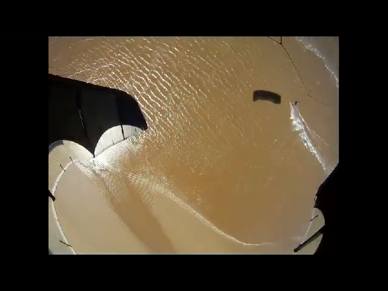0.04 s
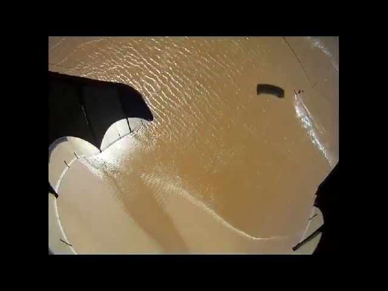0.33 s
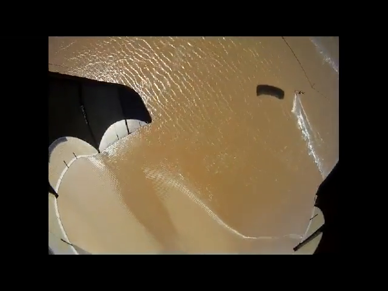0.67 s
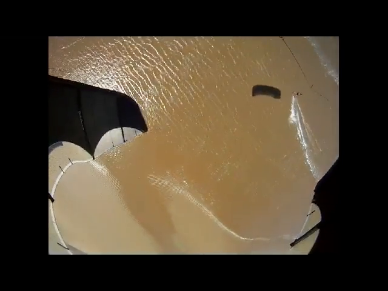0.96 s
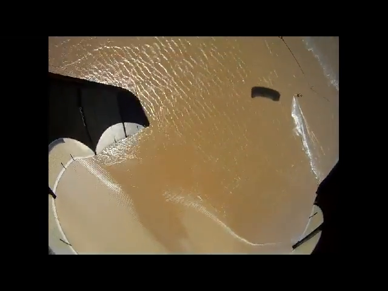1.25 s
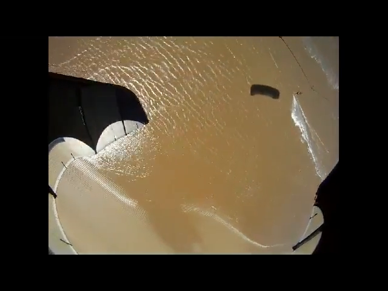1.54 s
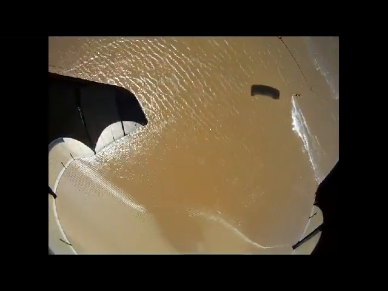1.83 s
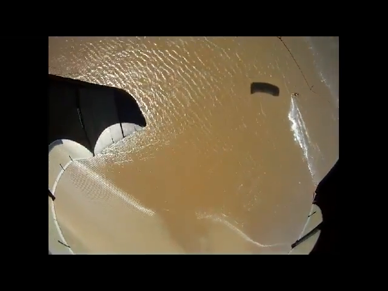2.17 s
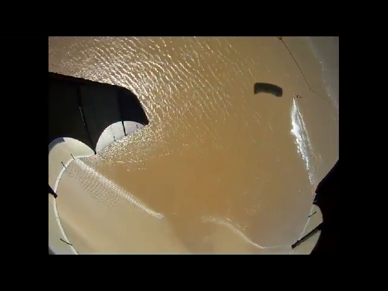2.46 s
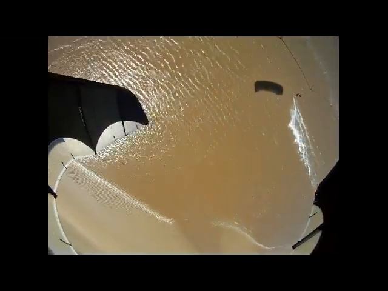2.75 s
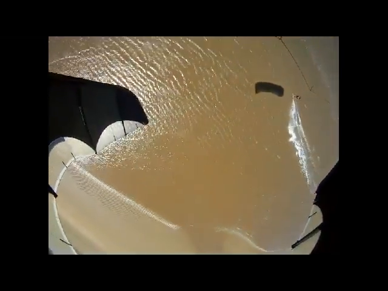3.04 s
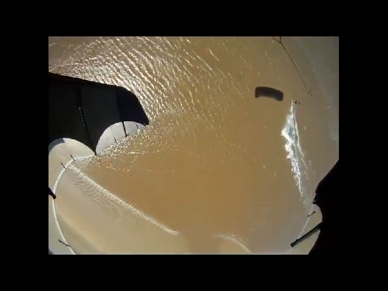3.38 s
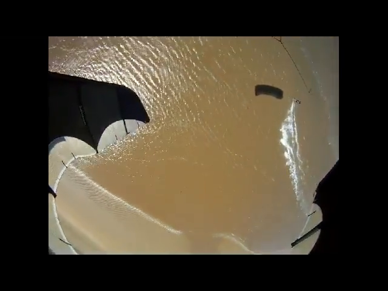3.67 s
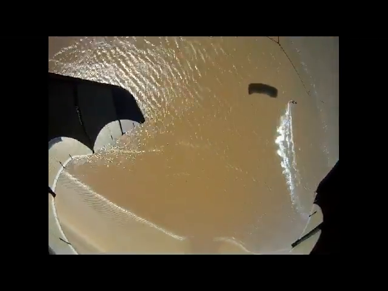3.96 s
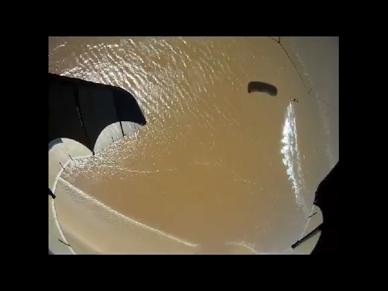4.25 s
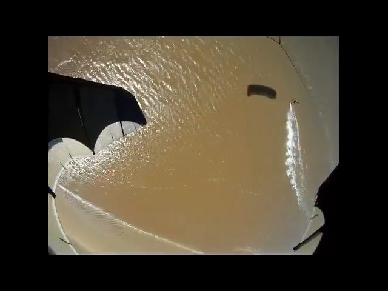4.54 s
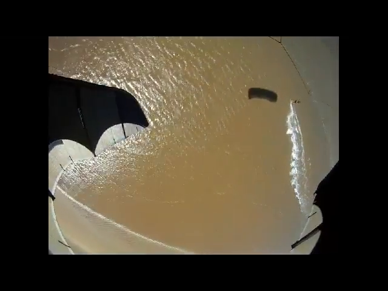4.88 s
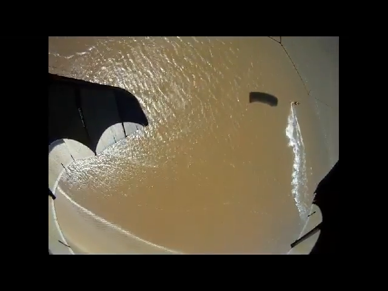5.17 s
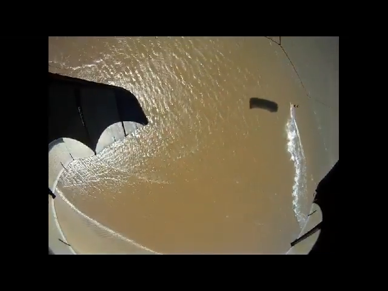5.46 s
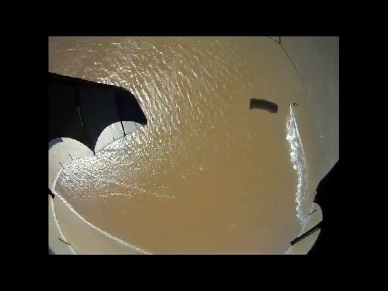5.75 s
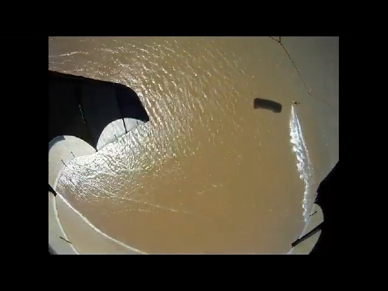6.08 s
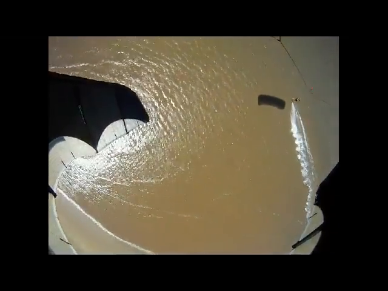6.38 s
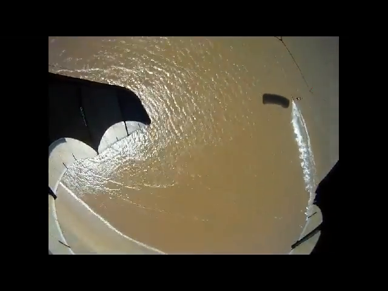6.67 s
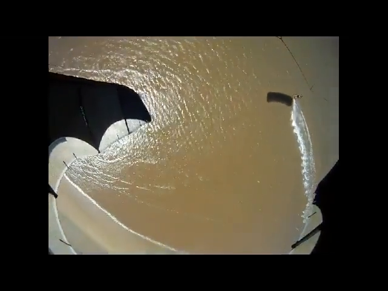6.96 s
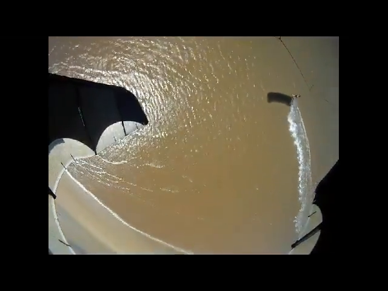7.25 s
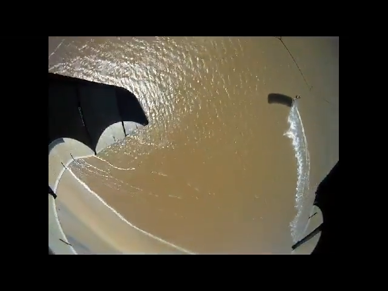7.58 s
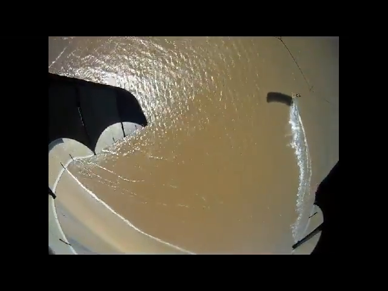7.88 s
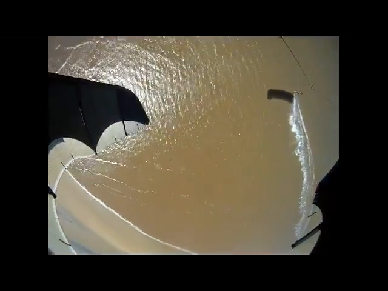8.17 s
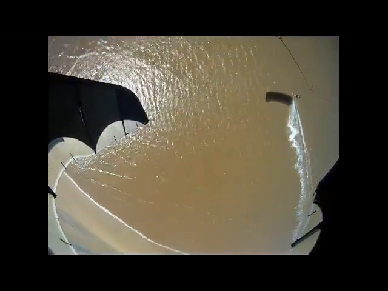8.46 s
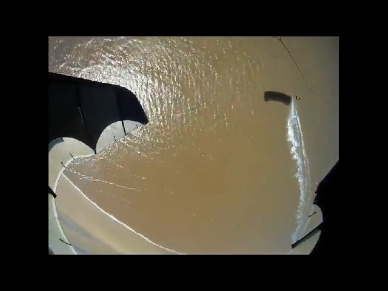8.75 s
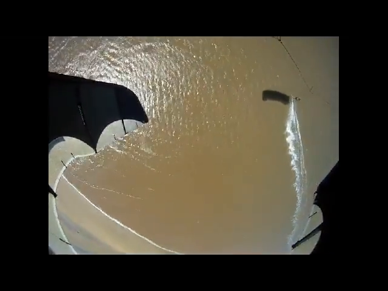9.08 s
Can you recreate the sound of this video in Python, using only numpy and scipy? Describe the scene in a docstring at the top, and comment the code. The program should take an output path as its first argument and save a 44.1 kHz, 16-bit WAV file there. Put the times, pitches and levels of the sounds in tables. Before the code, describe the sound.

Wind buffets the microphone of a camera hanging from a kite over shallow water, making a continuous low, uneven rumble. Above it the taut lines sing in several wavering tones that glide up and down, swelling and fading over a soft rush of air. The rig hums along and gives occasional light knocks and ticks. A thin, glassy edge sits on top of the tones.

```python
"""Wind buffets the microphone of a small camera that hangs from a kite above shallow water.
Eddies press on it in low, lumpy gusts, and the taut lines shed vortices that sing in gliding tones.
Air rushes past and shakes the rig, which hums along with the lines and knocks and ticks now and then.
The camera samples slowly and holds each sample, which mirrors the tones into a thin, glassy treble."""
import sys
import numpy as np
from scipy import signal
from scipy.fft import rfft, irfft
from scipy.io import wavfile

SR = 44100
rng = np.random.default_rng(int(sys.argv[2]) if len(sys.argv) > 2 else 0)


def generate_wav(sig):
    """Save sig (samples, or channels by samples) to the path in sys.argv[1] as 16-bit PCM at SR."""
    pcm = np.round(np.clip(np.atleast_2d(sig).T, -1, 1) * 32767).astype(np.int16)
    wavfile.write(sys.argv[1], SR, pcm)


N = 402191
TIME = np.arange(N) / SR

# strength of the eddies on the microphone: (time [s], level [dB])
EDDY_LEVEL = [(0.0, -30.5), (0.16, -35.5), (1.44, -22), (1.7, -25), (3.7, -27), (4.14, -22), (4.72, -26.5),
              (4.88, -30), (5.48, -27.5), (5.6, -33), (5.78, -24), (6.6, -25), (6.86, -27), (7.5, -29),
              (7.66, -25), (8.72, -26), (8.88, -21), (9.12, -25.5)]
# body of the smaller eddies: (frequency [Hz], relative density [dB])
EDDY_SPECTRUM = [(25, -26), (48, -3), (64, -4.5), (88, -1), (105, -4), (130, -3), (155, -8), (180, -6),
                 (200, -13.5), (240, -17.5), (305, -25.5), (430, -31), (620, -37.5), (1400, -73)]
# swells of the largest eddies: (time [s], level [dB])
GUSTS = [(.72, -29), (1.7, -22), (2.2, -24), (3.15, -28.5), (3.47, -26.5), (4.45, -22), (6.0, -33.5),
         (6.65, -27), (6.95, -29), (8.45, -23.5), (8.9, -27.5)]
# low end of the largest eddies: (frequency [Hz], relative density [dB])
RUMBLE_SPECTRUM = [(10, -21), (20, -3.5), (28, -2), (40, -7.5), (55, -9), (90, -28), (300, -78)]
def buffeting(eddy_db, surge_db, heave_db=-29.5, gust_s=0.089):
    """Eddies press on the microphone port in uneven lumps, over the slow heave of the largest ones."""
    gust_power = sum(amp(db) ** 2 * np.exp(-((TIME - s) / gust_s) ** 2) for s, db in GUSTS)
    heave = amp(heave_db + 0.32 * surge_db + wander(4.8))
    lumps = noise(EDDY_SPECTRUM) * amp(eddy_db + 0.5 + 0.7 * wander(20))
    rumble = noise(RUMBLE_SPECTRUM) * np.sqrt(heave ** 2 + gust_power)
    return lumps + rumble


# the lower line, gliding with the air speed across it: (time [s], pitch [Hz], level [dB])
LOW_LINE = [(0, 767, -55), (0.5, 883, -65), (0.68, 921, -40), (1.1, 909, -43), (1.6, 1056, -32.5),
            (1.96, 1064, -30.5), (2.48, 1055, -37.5), (3.3, 1037, -34.5), (3.54, 1027, -48.5),
            (3.82, 1042, -35.5), (4.14, 1099, -33.5), (4.28, 1029, -32), (4.56, 938.4, -40.5),
            (5.1, 928, -43), (5.42, 927, -58), (5.8, 1065, -43), (6.2, 1060, -32.5), (6.42, 1068, -37),
            (6.56, 1077, -26.5), (6.9, 906, -49.5), (7.34, 954, -38.0), (7.84, 1003, -45),
            (8.06, 1024, -29.5), (8.3, 1020, -34), (8.68, 1055, -31), (9.12, 1044, -30.5)]
# the upper line: (time [s], pitch [Hz], level [dB])
HIGH_LINE = [(0, 1042, -37), (0.34, 1126, -36), (0.5, 1151, -42.4), (0.92, 1224, -40.5), (1.1, 1377, -46.5),
             (1.36, 1456, -46.5), (1.6, 1407, -42.5), (2.34, 1394, -39.3), (2.64, 1454, -45.5),
             (3.08, 1383, -47), (3.66, 1427, -45), (3.9, 1592, -47), (4.28, 1401, -45), (4.72, 1314, -49),
             (5.38, 1379, -42.2), (5.96, 1442, -43), (6.24, 1419, -37), (6.6, 1174, -43),
             (7.0, 1244, -44.5), (7.38, 1382, -44.5), (7.9, 1405, -37.0), (8.34, 1442, -50),
             (8.66, 1536, -42.5), (9.12, 1464, -47)]
# a thinner line that comes up in the last gust: (time [s], pitch [Hz], level [dB])
THIN_LINE = [(7.7, 1467, -66), (8.1, 1555, -47), (8.25, 1550, -46.5), (8.5, 1752, -45), (8.72, 1656, -54),
             (8.98, 1620, -49), (9.12, 1554, -58)]
def singing_lines(surge_db, thick_ratio=0.905):
    """Four taut lines sing. The thickest shares the lower line's air and swells with the buffeting."""
    low_hz, low_db = curves(LOW_LINE)
    leads = vortex_tone(low_hz, low_db) + vortex_tone(*curves(HIGH_LINE))
    thick = vortex_tone(thick_ratio * low_hz, surge_db, gain_db=-52.5)
    thin = vortex_tone(*curves(THIN_LINE))
    return leads + thick + thin


# stretches of a line that meet the air at other speeds: (pitch [ratio], width [Hz], level [dB])
STRETCHES = [(.994, 14.7, -6), (.955, 15.3, -9), (1.04, 12, -7), (1.11, 8.7, -15.5)]
def vortex_tone(hz, level_db, gain_db=-3, flicker_db=1.62, lock=0.13):
    """A line sheds vortices: one clear tone among restless ones from its other stretches."""
    phase = 2 * np.pi * np.cumsum(hz * (1 + 0.01 * wander(7))) / SR
    tone = np.cos(phase)
    loose_db = -0.76 - lock * (level_db - level_db.mean())  # a louder line locks more onto one pitch
    for ratio, width, db in STRETCHES:
        restless = wander(width) * np.cos(ratio * phase) + wander(width) * np.sin(ratio * phase)
        tone += amp(db + loose_db) * restless
    return tone * amp(level_db + gain_db + flicker_db * wander(8.7))


# strength of the air streaming past the camera: (time [s], level [dB])
AIRFLOW = [(0.0, -54), (0.62, -55), (0.9, -52), (1.52, -53.5), (1.84, -52), (3.18, -51), (4.04, -49),
           (4.84, -53.5), (5.3, -51.5), (5.9, -49), (7.08, -52), (8.18, -52), (8.48, -49.5), (9.12, -50.5)]
# colour of the rush: (frequency [Hz], relative density [dB])
RUSH_SPECTRUM = [(200, -33.5), (500, -6.5), (620, -6.5), (760, 9), (900, 3.5), (1280, -20), (1780, -11),
                 (2050, 0), (2450, -12), (2980, -17.5), (3450, -4), (4150, -20.5), (5100, -23), (5800, -15)]
def rushing(airflow_db, surge_db, air_db=6, rig_db=3, flutter_db=1.04):
    """Air hisses past the camera and shakes the rig, harder in a surge; both flutter together."""
    air = amp(air_db) * noise(RUSH_SPECTRUM)
    shaking = amp(rig_db + 0.31 * surge_db) * unit(rig(rng.standard_normal(N)))
    return (air + shaking) * amp(airflow_db + flutter_db * wander(17))


# resonances of the rig: (frequency [Hz], nominal width [Hz], gain [dB])
RIG_MODES = [(524, 127, -3.5), (712, 57, -2.5), (805, 210, -11), (921, 59, -1.5), (1097, 96, 2.5),
             (1368, 68, -3.5), (1590, 70, -4.5), (1990, 168, -6), (2140, 195, -9.5), (2595, 100, -12.5),
             (3277, 235, -11.5), (3603, 63, -9), (4596, 134, -16), (4774, 190, -17.5), (5470, 250, -21)]
def rig(force):
    """The rig's resonances ring in answer to a force."""
    return sum(amp(db) * resonate(force, hz, 1.32 * width) for hz, width, db in RIG_MODES)


def humming(lines, hz=1070, width=190, reach_hz=150, level_db=-43):
    """The lines drive the rig's strongest resonance, harder as their pitch comes near it."""
    drive = sum(amp(db) / np.hypot(1, (pitch - hz) / reach_hz) for pitch, db in map(curves, lines))
    hum = resonate(rng.standard_normal(N), hz, width)
    return unit(hum * drive ** 0.55) * amp(level_db)


# knocks and ticks of the rig: (time [s], level [dB], centre of the colour [Hz])
KNOCKS = [(.397, -43, 3900), (.4, -43, 1888), (.835, -25, 1084), (.848, -35.5, 2000), (.873, -42, 2300),
          (2.0647, -42, 2806), (2.12, -38.5, 2950), (2.808, -43, 3690), (3.357, -30, 947),
          (3.445, -38.5, 2280), (3.62, -40, 2210), (3.745, -40.5, 3215), (3.936, -43, 3370),
          (3.982, -43, 2587), (5.833, -40, 2490), (5.853, -37, 2320), (5.917, -41, 2770),
          (5.976, -38.5, 2523), (6.768, -38, 2800), (7.088, -45, 4165), (7.188, -30, 1190),
          (7.364, -43, 2300), (7.542, -30, 1103), (7.986, -41, 2200), (8.535, -45, 1994)]
def knocking(gain_db=-4, decay_s=0.0053, click=0.17, thud_hz=620, dull_hz=1100):
    """Fittings jolt the rig: a brief rattle of force, heard directly and through rig and housing."""
    t = np.arange(SR // 12) / SR
    out = np.zeros(N + len(t))
    for s, db, hz in KNOCKS:
        jolt = rng.standard_normal(len(t)) * np.exp(-t / decay_s)
        force = resonate(jolt, hz, width=0.99 * hz)
        housing = resonate(jolt, thud_hz, width=thud_hz)
        thud = 0.58 * min(dull_hz / hz, 1) ** 2  # duller knocks thud more on the camera's housing
        knock = unit(rig(force)) + click * unit(force) + thud * unit(housing)
        attack_rms = np.std(knock[:SR // 100])
        out[round(s * SR):][:len(t)] += amp(db + gain_db) * knock / attack_rms
    return out[:N]


def rustling(airflow_db, ticks_per_s=40, gain_db=-13, decay_s=0.012):
    """Cloth and fittings give small random ticks, stronger in fast air."""
    sizes = rng.uniform(0.4, 1, N)
    ticks = (rng.random(N) < ticks_per_s / SR) * sizes
    envelope = signal.lfilter([1], [1, -np.exp(-1 / (decay_s * SR))], ticks)
    rustle = rig(envelope * rng.standard_normal(N))
    return unit(np.gradient(rustle)) * amp(airflow_db + gain_db)  # the gradient brightens it


def amp(db):
    """Decibels to gain."""
    return 10 ** (np.asarray(db) / 20)


def unit(x):
    """Scales to rms 1."""
    return x / np.sqrt(np.mean(x ** 2) + 1e-20)


def curves(rows):
    """A timed table as automation curves, one for each column after the time."""
    times, *columns = np.transpose(rows)
    return [np.interp(TIME, times, column) for column in columns]


def noise(spectrum):
    """Noise of rms 1 with the given spectrum."""
    hz, db = np.transpose(spectrum)
    bins = np.fft.rfftfreq(N, 1 / SR)
    colour = amp(np.interp(np.log(bins + 1), np.log(hz), db))
    return unit(irfft(rfft(rng.standard_normal(N)) * colour, N))


def wander(hz, points=8192):
    """Random drift of rms 1 that rolls off above hz."""
    bins = np.fft.rfftfreq(points, TIME[-1] / points)
    band = bins / (bins + 2) / (1 + (bins / hz) ** 2)
    drift = irfft(rfft(rng.standard_normal(points)) * band)
    return unit(np.interp(TIME, np.linspace(0, TIME[-1], points), drift))


def resonate(x, hz, width):
    """Two like resonators in series, each width Hz wide, with a peak gain of 1."""
    b, a = signal.iirpeak(hz, hz / width, fs=SR)
    return signal.lfilter(b, a, signal.lfilter(b, a, x))


def scene():
    """Wind, lines and rig at one microphone, over its faint hiss."""
    (eddy_db,), (airflow_db,) = curves(EDDY_LEVEL), curves(AIRFLOW)
    surge_db = eddy_db - eddy_db.mean()
    wind = buffeting(eddy_db, surge_db) + rushing(airflow_db, surge_db)
    lines = singing_lines(surge_db)
    hiss = amp(-62) * rng.standard_normal(N)
    rig_sounds = humming([LOW_LINE, HIGH_LINE]) + knocking() + rustling(airflow_db)
    return (wind + lines + rig_sounds + hiss)[None]


def record(dry, camera_rate=12000, guard_hz=5850, soft_hz=17000, edge_hz=15400):
    """The camera holds each slow sample as a step, which mirrors the sound around its sampling rate."""
    guarded = signal.oaconvolve(dry[0], signal.firwin(101, guard_hz, fs=SR), "same")
    steps = np.repeat(signal.resample_poly(guarded, camera_rate, SR), 8)
    step_rate = 8 * camera_rate
    softened = signal.lfilter(*signal.butter(2, soft_hz, fs=step_rate), steps)
    held = signal.resample_poly(softened, SR, step_rate)[:N]
    band_limit = signal.firwin(511, edge_hz, window=("kaiser", 9), fs=SR)
    return signal.oaconvolve(held, band_limit, "same")[None]


dry = scene()
out = record(dry)
generate_wav(out)
```